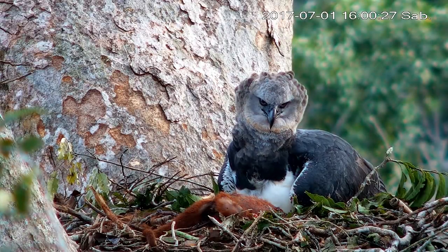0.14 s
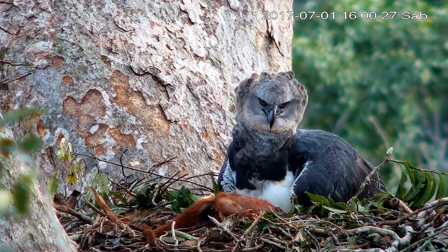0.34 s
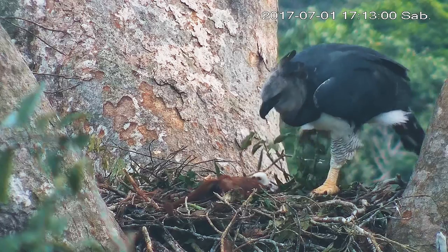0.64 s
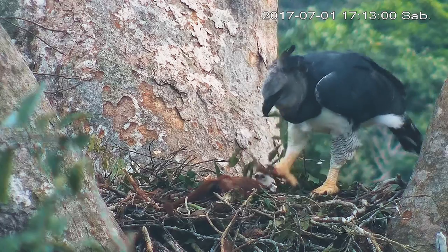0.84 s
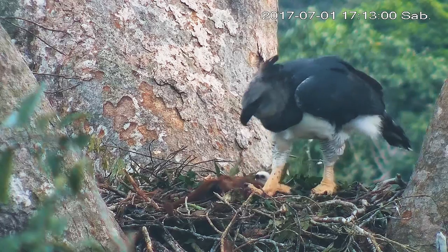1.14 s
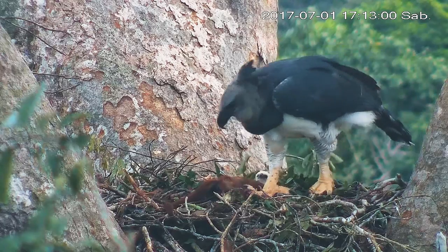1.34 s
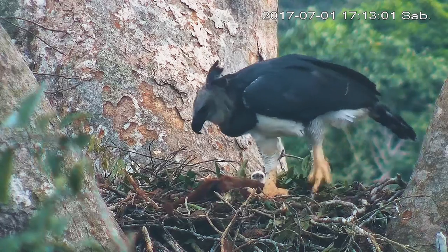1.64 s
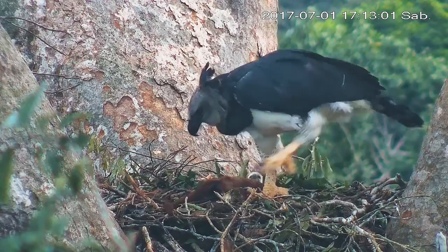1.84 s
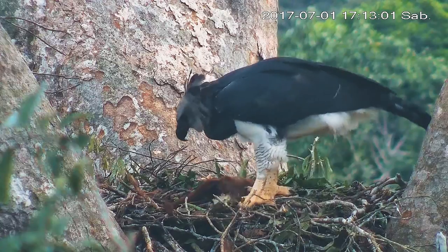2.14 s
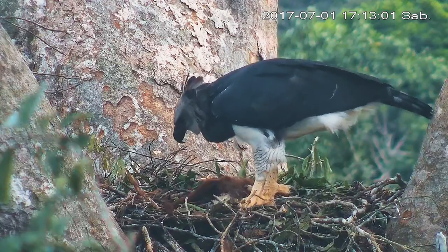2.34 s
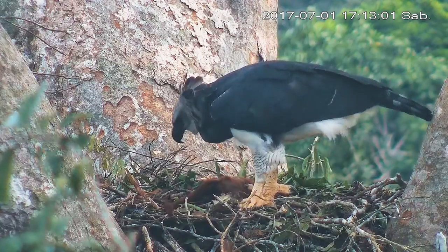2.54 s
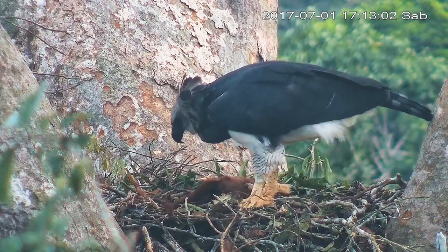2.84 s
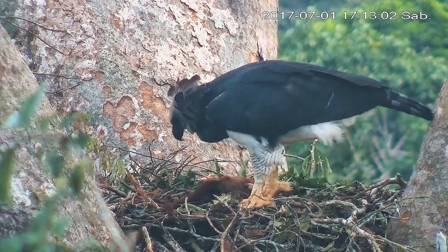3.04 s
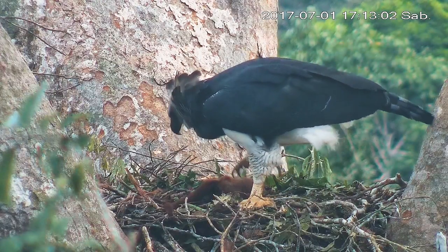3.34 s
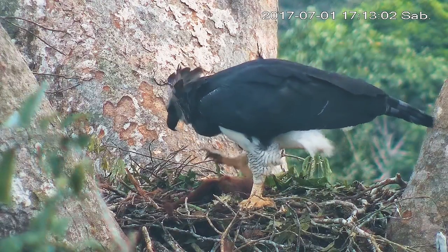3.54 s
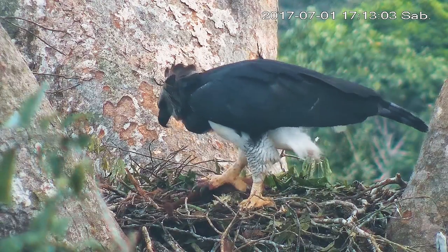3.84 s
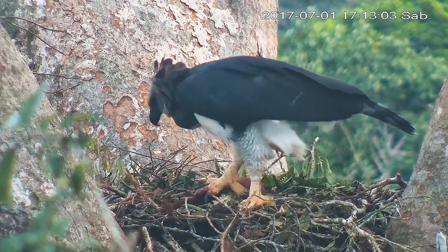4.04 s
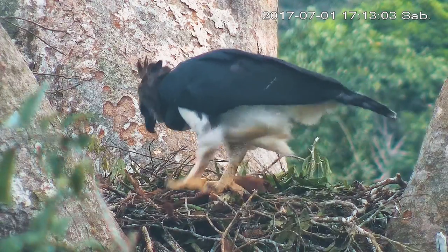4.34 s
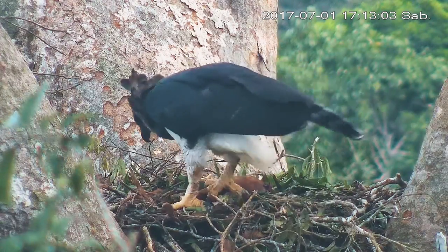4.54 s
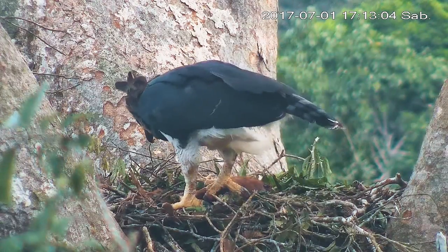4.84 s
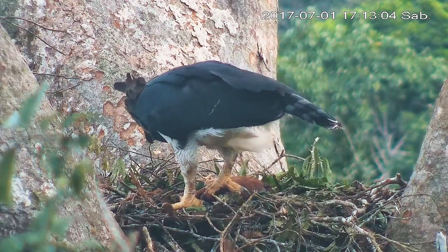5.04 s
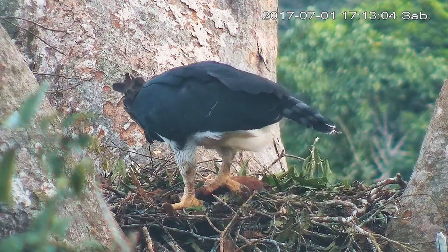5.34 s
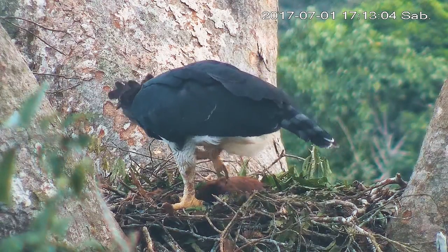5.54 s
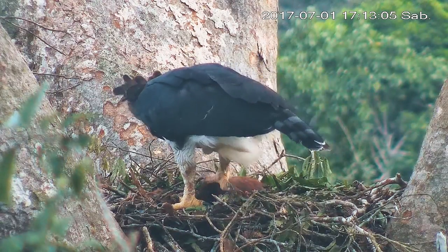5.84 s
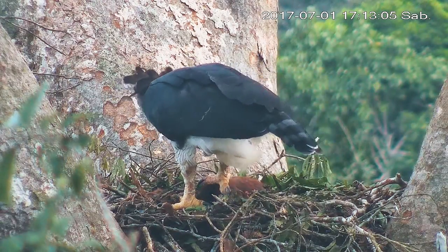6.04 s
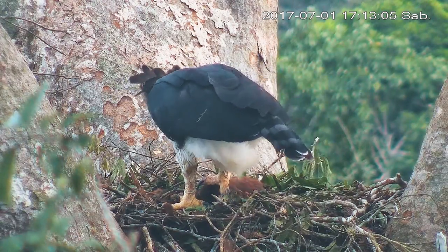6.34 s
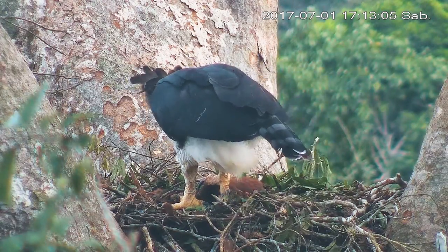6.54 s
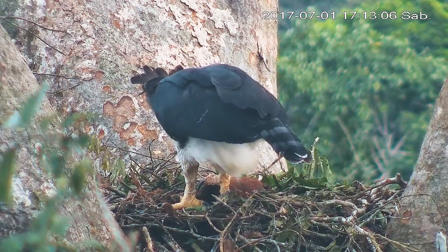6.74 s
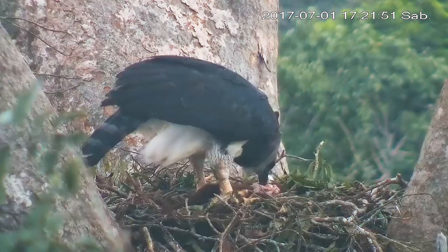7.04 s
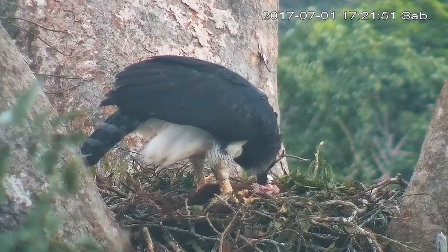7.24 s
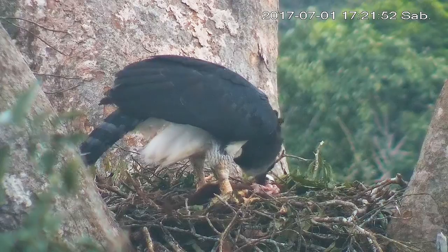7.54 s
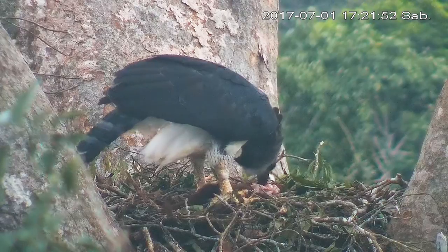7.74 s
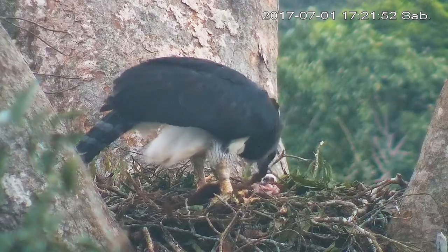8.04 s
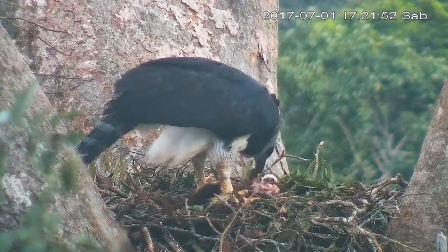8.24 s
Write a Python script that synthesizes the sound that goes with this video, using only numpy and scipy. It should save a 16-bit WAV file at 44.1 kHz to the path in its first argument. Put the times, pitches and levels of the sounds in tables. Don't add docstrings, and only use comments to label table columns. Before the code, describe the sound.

A rainforest canopy heard through an outdoor stereo microphone. Throughout, a distant cicada chorus holds a dense, gently swelling buzz around 4.4 kHz, with thinner cricket trills at 7.5 to 9 kHz starting and stopping, over soft leaf noise and broad hiss. From 0 to 0.8 seconds a fly hums faintly, returning very weakly near 1.2 and 1.5. Twigs crackle at about 1.0; a tiny leaf tick comes at 2.7. At 3.1 to 3.4 a bird on the left chatters in rapid hoarse dives. A dry snap lands at 4.0, a soft knock at 4.6, and a leaf rustles at 5.5. From 5.2 another bird, left of centre, whistles short pure notes near 3.7 kHz, breaking into a fast falling trill from 5.8 to about 6.5. The chatter repeats at 6.6 to 6.8. The sharpest woody snap comes at 7.15, then a soft knock; insects continue to 8.4.

```python
import sys
import numpy as np
from scipy import signal
from scipy.fft import rfft, irfft, next_fast_len
from scipy.io import wavfile
from scipy.ndimage import map_coordinates

SR = 44100
rng = np.random.default_rng(int(sys.argv[2]) if len(sys.argv) > 2 else 0)


def gain_from_decibels(decibels):
    exponent = np.asarray(decibels, float) / 20
    return 10 ** exponent


def generate_wav(signal):
    frames = np.transpose(np.atleast_2d(signal))
    scaled = np.clip(frames, -1, 1) * 32767
    pcm = np.round(scaled).astype(np.int16)
    wavfile.write(sys.argv[1], SR, pcm)


N = 369558
T = np.arange(N) / SR


def unit(x):
    return x / np.sqrt(np.mean(x ** 2) + 1e-20)


def along(points, hz):
    f, v = np.transpose(points)
    return np.interp(np.log(hz + 1), np.log(f + 1), v)


def curves(rows):
    s, *cols = np.transpose(rows)
    return [np.interp(T, s, c) for c in cols]


def wobble(rate):
    knots = rng.standard_normal(int(N * rate / SR) + 4)
    return map_coordinates(knots, [T * rate])


def filtered(x, response):
    m = next_fast_len(x.shape[-1] + 4096)
    spectrum = rfft(x, m) * response(np.fft.rfftfreq(m, 1 / SR))
    return irfft(spectrum, m)[..., :x.shape[-1]]


def placed(x, pan_db):
    left, right = gain_from_decibels(pan_db / 2 + 0 * x), gain_from_decibels(-pan_db / 2 + 0 * x)
    return x * np.array([left, right])


def forest(x, t60, wet, size=8192):
    out, t = np.zeros((2, N + 4 * size + SR)), np.arange(SR // 2) / SR
    padded, wet = np.pad(x, ((0, 0), (size, 2 * size))), np.clip(wet, 0, 1)
    window = np.sin(np.pi * np.arange(2 * size) / (2 * size))
    for start in range(0, N + size, size):
        tail = rng.standard_normal((2, len(t))) * gain_from_decibels(-60 * t / t60) * (1 - np.exp(-t / 0.02))
        block = padded[:, start:start + 2 * size] * window
        echo = signal.fftconvolve(block, tail / np.linalg.norm(tail[0]), axes=1)
        out[:, start:start + echo.shape[1]] += echo
    return np.sqrt(1 - wet) * x + np.sqrt(wet) * out[:, size:size + N]


def air():
    # hz, level_db (per Hz)
    air_spectrum = [(22, -19), (40, 1), (70, -1), (200, 0.5), (450, -5.5), (1100, -4.5), (1500, -7),
                    (2200, -6), (3200, -10), (5500, -14.5), (7000, -17.5), (9500, -19), (13000, -20),
                    (15700, -21)]
    # hz, share
    coherence = [(35, .995), (85, .97), (177, .89), (354, .68), (707, .48), (1400, .4), (2800, .05),
                 (5000, .1), (12000, .24)]

    def mid_side(hz):
        angle = np.arccos(np.clip(along(coherence, hz), -1, 1)) / 2
        return gain_from_decibels(along(air_spectrum, hz)) * [np.cos(angle), np.sin(angle)]

    mid, side = filtered(rng.standard_normal((2, N)), mid_side)
    return gain_from_decibels(-52.5 + 0.14 * wobble(2.0)) * unit(np.array([mid + side, mid - side]))


def cicadas():
    # time_s, level_db
    chorus_levels = [(0, -48.5), (.8, -47.5), (1.6, -49.5), (2.4, -50.5), (2.9, -48.5), (3.4, -50.4),
                     (3.9, -48), (4.25, -50), (4.9, -50), (5.55, -48), (5.9, -51), (6.2, -48.5),
                     (7.45, -48), (7.7, -50.5), (8.38, -48)]
    tymbal_hz, drift_hz = 4380, 20
    level_db, = curves(chorus_levels)
    clicks = (rng.random((4, N)) < .25) * rng.standard_normal((4, N))
    clicks[1::2] += 0.05 * clicks[::2]

    def spread(hz):
        body = np.exp(-.5 * (hz / 310) ** 2)
        core = 0.16 * np.exp(-.5 * (hz / 130) ** 2)
        skirt = 0.14 * np.exp(-hz / 500)
        return body + core + skirt

    slow = filtered(clicks, spread)
    phase = 2 * np.pi * np.cumsum(tymbal_hz + drift_hz * wobble(3)) / SR
    swell = gain_from_decibels(level_db - 1 + 0.16 * wobble(5) + 0.36 * wobble(30))
    ringing = unit(slow[:2] * np.cos(phase) + slow[2:] * np.sin(phase))
    return placed(swell, -0.59) * ringing


def crickets():
    # start_s, end_s, pitch_hz, level_db
    bouts = [(-.5, .85, 8950, -68), (1.15, 4.12, 8950, -68), (4.5, 7.9, 8950, -66.5), (-.5, .87, 8830, -63),
             (1.13, 5.5, 8835, -63.5), (6.03, 7.12, 8835, -63.5), (7.28, 9, 8825, -63),
             (-.5, 1.52, 8640, -62), (1.5, 9, 8600, -71), (-.5, 6.3, 8370, -77), (6.3, 9, 8350, -73),
             (-.5, 4.42, 7930, -66.5), (-.5, 2.12, 7790, -61.5), (5.98, 9, 7820, -62), (7.15, 9, 7930, -65),
             (-.5, 9, 7590, -70), (-.5, 9, 7450, -75)]
    # pitch_hz, strokes_per_s, pan_db
    kinds = [(7450, 50, -4), (7590, 51, -4), (7800, 56, -1), (7930, 58, -1.5), (8360, 47, -1.5),
             (8640, 42, -3), (8830, 43, -.5), (8950, 44, -.5)]
    choir = np.zeros((2, N))
    kind_hz, rates, pans_db = np.transpose(kinds)
    for start, end, hz, db in bouts:
        rate, pan_db = np.interp(hz, kind_hz, rates), np.interp(hz, kind_hz, pans_db)
        count = np.cumsum(rate * (1 + .04 * wobble(20))) / SR
        stroke = count % 1
        slip = np.cumsum(rng.normal(0, 1.5, 800))[count.astype(int)]
        cold = np.exp(-np.clip(T - start, 0, None) / .08)
        pitch = hz * (.998 - .06 * (1 - stroke) ** 3.2 - .03 * cold)
        gate = np.clip((T - start) / .06, 0, 1) * np.clip((end - T) / .03, 0, 1)
        shape = np.sin(np.pi * stroke) ** 0.57 * gain_from_decibels(0.66 * wobble(12) + 0.8 * wobble(3))
        tone = np.sin(2 * np.pi * np.cumsum(pitch) / SR + slip)
        choir += placed(gain_from_decibels(db + 9) * gate * shape * tone, pan_db)
    return forest(choir, t60=0.36, wet=0.74, size=4096)


def fly():
    # time_s, beat_hz
    wing_beat = [
        (0, 403),
        (.75, 402),
        (1.2, 385),
        (1.47, 412),
        (1.6, 410),
    ]
    # partial, start_s, end_s, level_db
    glints = [
        (1, .05, .45, -67),
        (3, .12, .5, -73),
        (2, .42, .74, -68.5),
        (2, .95, 1.2, -77),
        (2, 1.44, 1.5, -70),
    ]
    fade_db_per_s = 150
    hz, = curves(wing_beat)
    phase = 2 * np.pi * np.cumsum(hz + 1.7 * wobble(21.4)) / SR
    hum = np.zeros(N)
    for partial, start, end, db in glints:
        away_s = np.clip(np.maximum(start - T, T - end), 0, None)
        hum += gain_from_decibels(db + 2.5 - fade_db_per_s * away_s) * np.sin(partial * phase)
    return hum


def twigs():
    # start_s, level_db, centre_hz, width_octaves, t60_s
    crackles = [
        (0.984, -53.5, 3000, 1.1, 0.35),
        (1.031, -53.5, 2600, 1.1, 0.51),
        (2.714, -60.5, 11000, .6, .08),
        (4.021, -47, 2000, 1.2, 0.071),
        (4.567, -53, 2200, .5, .06),
        (5.518, -59, 11000, 0.48, 0.25),
        (7.1525, -41, 4000, 1.2, 0.018),
        (7.155, -47, 2500, 1.5, 0.078),
        (7.268, -55, 2200, .6, .05),
    ]
    # mode_hz, level_db, t60_s
    wood_modes = [(760, -14, .04), (969, -5, .05), (1330, -8, .035), (2150, 0, .018), (3700, -3, .01)]
    # start_s, level_db
    snap_s, snap_db = (7.1527, -41.5)
    out, t = np.zeros((2, N + SR)), np.arange(SR // 2) / SR
    for s, db, centre_hz, octaves, t60 in crackles:
        band = lambda hz: np.exp(-.5 * (np.log2((hz + 1) / centre_hz) / octaves) ** 2)
        noise = rng.standard_normal((2, len(t)))
        burst = unit(filtered(noise + 1.7 * noise[0], band)) * gain_from_decibels(-60 * t / t60)
        out[:, round(s * SR):][:, :len(t)] += placed(gain_from_decibels(db) + 0 * t, -5) * burst
    ring = sum(gain_from_decibels(db - 60 * t / t60) * np.sin(2 * np.pi * hz * t) for hz, db, t60 in wood_modes)
    out[:, round(snap_s * SR):][:, :len(t)] += gain_from_decibels(snap_db) * ring
    return out[:, :N]


def chatter():
    # time_s, peak_db
    syllables = [(3.14, -38.5), (3.214, -37.5), (3.2457, -42.5), (3.2796, -44), (3.3189, -37),
                 (3.3507, -39.5), (6.585, -37), (6.6661, -46.5), (6.6976, -36.5), (6.7315, -46.5),
                 (6.7697, -37), (6.8022, -36.5)]
    # hz, level_db (per Hz)
    rasp_spectrum = [(1200, -22), (1900, -3.5), (2500, -17), (3200, -12.5), (5500, -8.5), (7000, -14),
                     (10000, -13.5), (12000, -18.5), (14500, -16), (15700, -20)]
    loudest_hz, dive_hz_per_s = 1875, 87000
    lead_in_db, hoarse_db, puff_db = -55, -51.5, -43.5
    tones, rasps, t = np.zeros((2, N)), np.zeros((2, N)), np.arange(-882, 2646) / SR
    pitch = np.clip(loudest_hz - dive_hz_per_s * (t - .002), 1200, 3000)
    tone = np.sin(2 * np.pi * np.cumsum(pitch) / SR)
    peak = np.exp(-.5 * ((t - .002) / .0023) ** 2)
    lead_in = np.exp(-.5 * ((t + .005) / .003) ** 2)
    puff = np.exp(-.5 * ((t - .002) / np.where(t < .002, .005, .013)) ** 2)
    hoarse_band = lambda hz: np.exp(-.5 * ((hz - 2480) / 260) ** 2)
    rasp_band = lambda hz: gain_from_decibels(along(rasp_spectrum, hz))
    for s, db in syllables:
        hoarse = unit(filtered(rng.standard_normal((2, len(t))), hoarse_band))
        rasp = unit(filtered(rng.standard_normal((2, len(t))), rasp_band))
        first = round(s * SR) - 882
        dive = (gain_from_decibels(db - 4.5) * peak + gain_from_decibels(lead_in_db) * lead_in) * tone
        breath = gain_from_decibels(hoarse_db) * hoarse + gain_from_decibels(puff_db) * rasp
        tones[:, first:][:, :len(t)] += placed(dive, 9.4)
        rasps[:, first:][:, :len(t)] += breath * np.roll(puff, -90)
    return forest(tones, t60=.4, wet=.14) + forest(rasps, t60=.55, wet=.33)


def whistle():
    # time_s, pitch_hz
    slide = [
        (5.16, 3703),
        (5.42, 3703),
        (5.46, 3657),
        (5.7, 3652),
        (5.74, 3636),
        (6.05, 3595),
        (6.3, 3510),
        (6.47, 3275),
        (6.6, 3255),
    ]
    # centre_s, peak_db, length_s
    tone_swells = [(5.2, -51.5, .055), (5.27, -49, .05), (5.325, -52, .06), (5.4, -54, .05),
                   (5.45, -57, .02), (5.49, -54, .025), (5.533, -50.5, .035), (5.585, -50, .022),
                   (5.632, -49.5, .055), (5.69, -59, .04), (5.756, -45.3, .045), (5.813, -51.3, .016)]
    # time_s, peak_db
    trill = [
        (5.83, -56),
        (5.9, -45.5),
        (5.99, -52),
        (6.09, -46.5),
        (6.14, -53),
        (6.215, -45),
        (6.29, -54),
        (6.33, -50),
        (6.4, -61),
        (6.6, -65),
    ]
    # time_s, pitch_hz, level_db, warble_hz
    thread_path = [
        (5.5, 3655, -76, 10),
        (5.85, 3625, -61.5, 40),
        (6.2, 3545, -56, 85),
        (6.33, 3480, -57.5, 130),
        (6.43, 3400, -59.5, 185),
        (6.55, 3400, -64, 150),
        (6.66, 3330, -80, 150),
    ]
    beat_s, beats_per_s, bead_s = 5.8985, 31, .02
    pan_db, sway_db = 5.5, 3.5
    lead_rad = 1.1
    beats = beat_s + (np.arange(-2, 22) + rng.normal(0, .08, 24)) / beats_per_s
    effort_db = np.interp(beats, *np.transpose(trill)) + rng.normal(0, 1, len(beats))
    beads = [(s, db, bead_s) for s, db in zip(beats, effort_db)]
    swell = gain_from_decibels(-61) * (T > slide[0][0]) * (T < slide[4][0])
    for centre, db, length in [*tone_swells, *beads]:
        note = gain_from_decibels(db - 1) * np.exp(-np.abs(1.9 * (T - centre) / length) ** 3)
        swell = np.maximum(swell, note)
    hz, = curves(slide)
    tone = np.sin(2 * np.pi * np.cumsum(hz) / SR + [[lead_rad], [0]])
    song = placed(gain_from_decibels(0.5) * swell, pan_db + sway_db * wobble(25)) * tone

    hz, db, warble_hz = curves(thread_path)
    pitch = hz + warble_hz * np.sin(2 * np.pi * beats_per_s * T + wobble(9))
    sounding = (T > thread_path[0][0]) * (T < thread_path[-1][0])
    thread = sounding * gain_from_decibels(db + 3) * np.sin(2 * np.pi * np.cumsum(pitch) / SR)
    return forest(song, t60=.2, wet=.04) + forest(placed(thread, pan_db), t60=0.36, wet=0.79)


def scene():
    return air() + cicadas() + crickets() + fly() + twigs() + chatter() + whistle()


def top_cut(x):
    return signal.sosfilt(signal.butter(12, 15790, fs=SR, output="sos"), x)


def record(dry):
    # pitch_hz, level_db (rms)
    whine_tones = [(15735, -89)]
    whine = sum(gain_from_decibels(db + 3) * np.sin(2 * np.pi * hz * T) for hz, db in whine_tones)
    return top_cut(dry + whine)


dry = scene()
out = record(dry)
generate_wav(out)
```